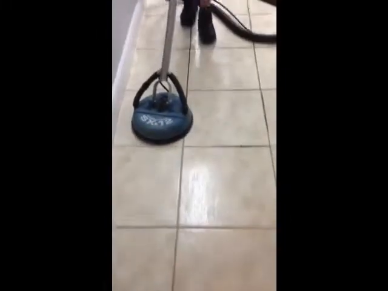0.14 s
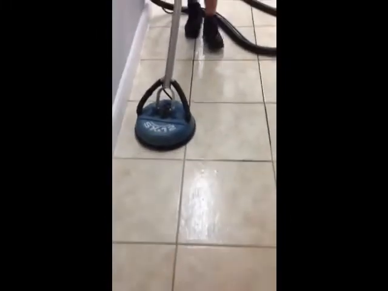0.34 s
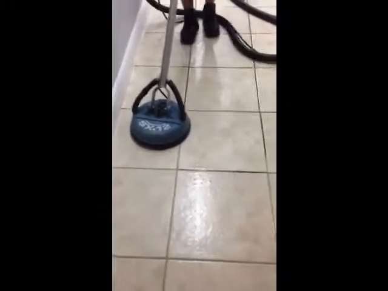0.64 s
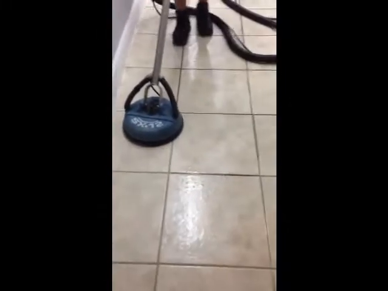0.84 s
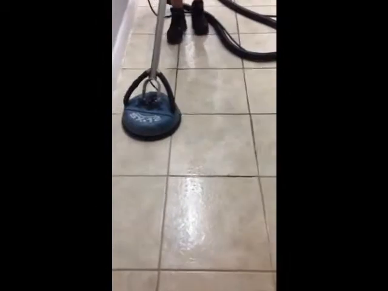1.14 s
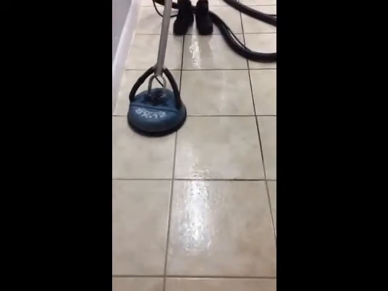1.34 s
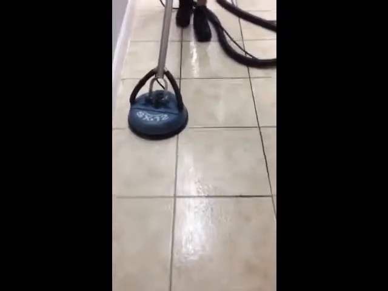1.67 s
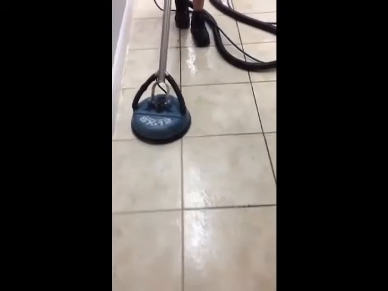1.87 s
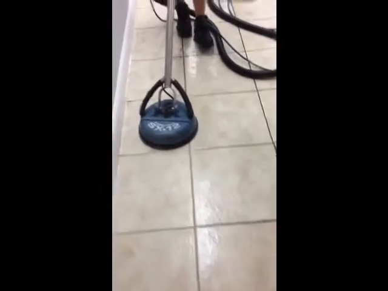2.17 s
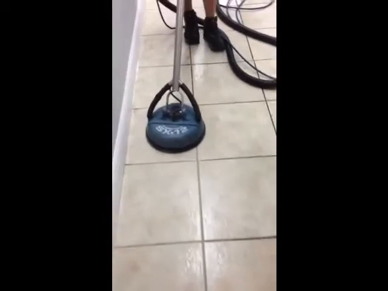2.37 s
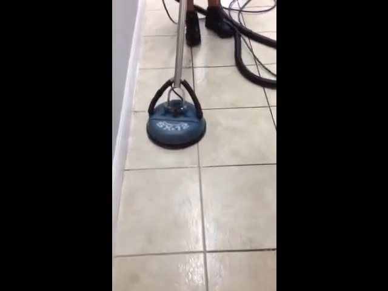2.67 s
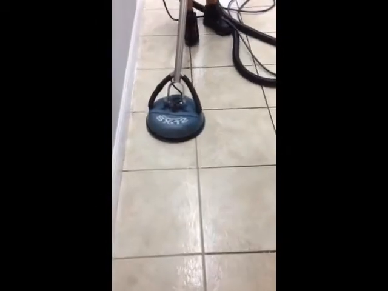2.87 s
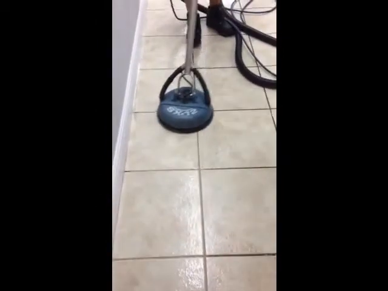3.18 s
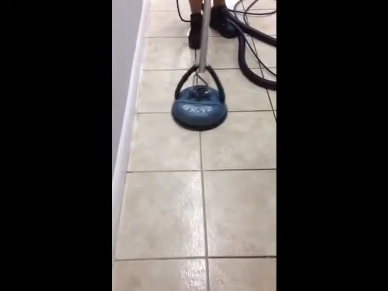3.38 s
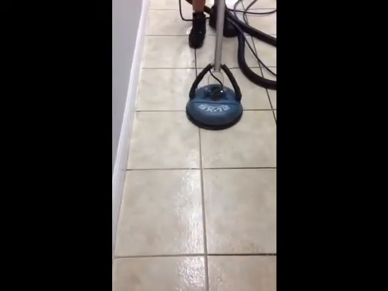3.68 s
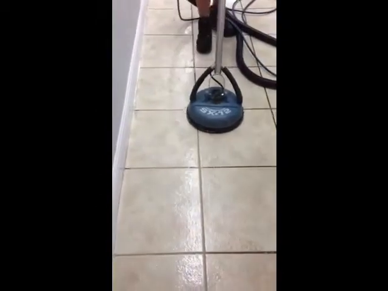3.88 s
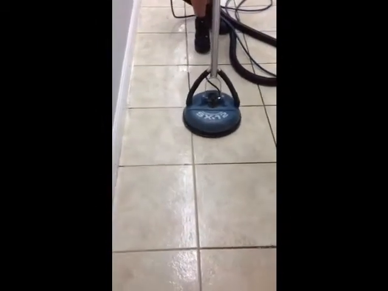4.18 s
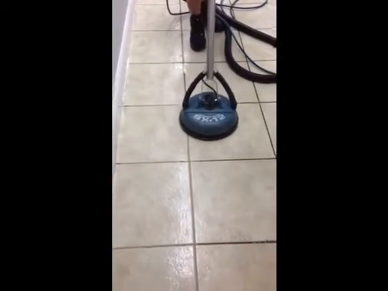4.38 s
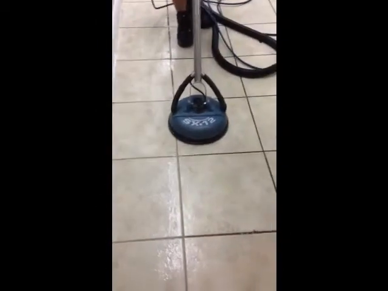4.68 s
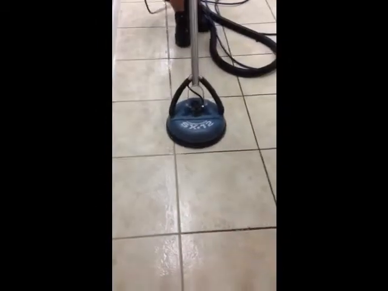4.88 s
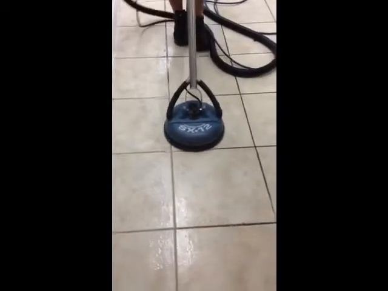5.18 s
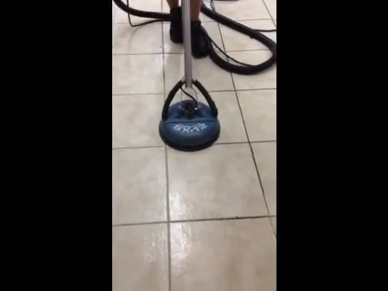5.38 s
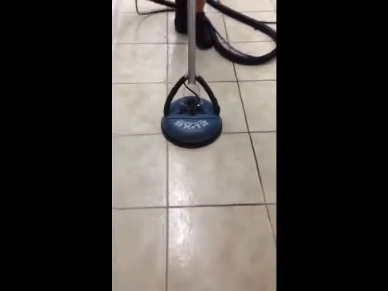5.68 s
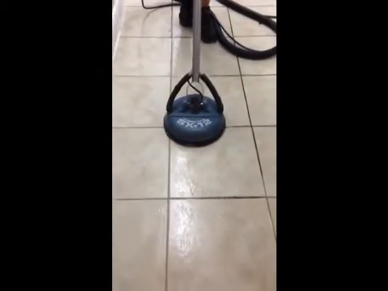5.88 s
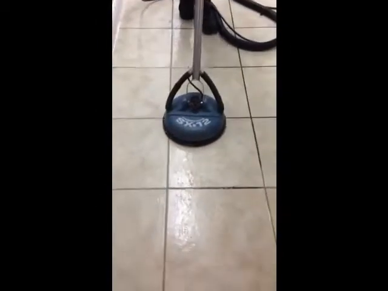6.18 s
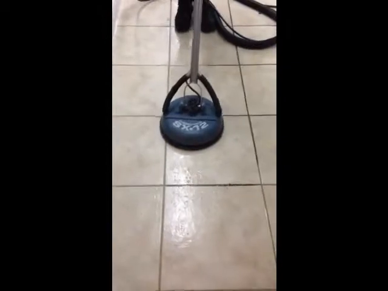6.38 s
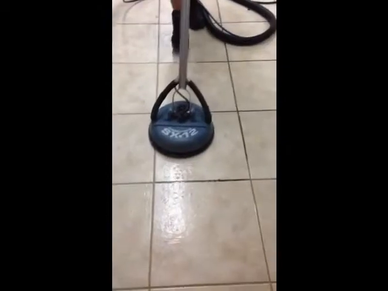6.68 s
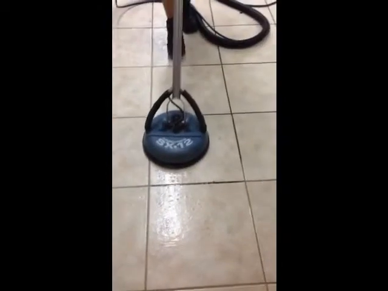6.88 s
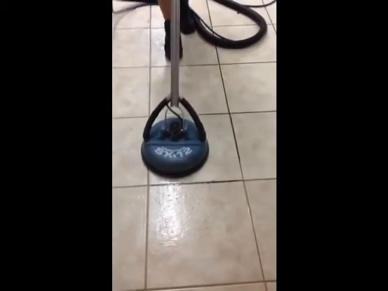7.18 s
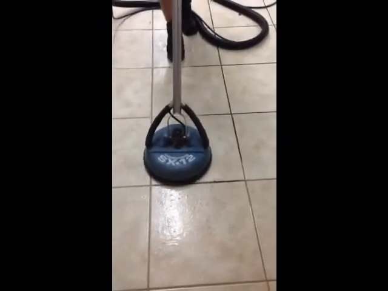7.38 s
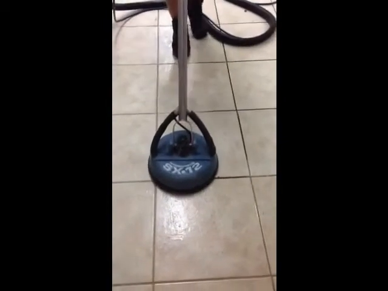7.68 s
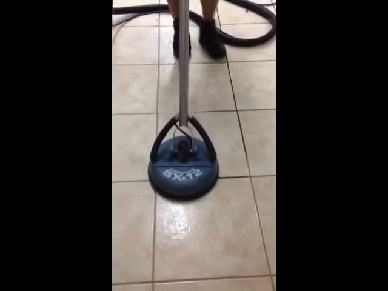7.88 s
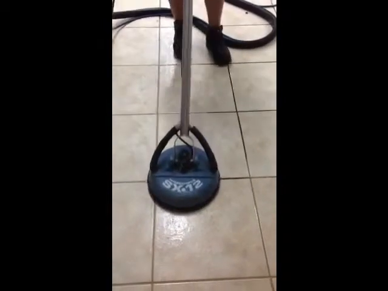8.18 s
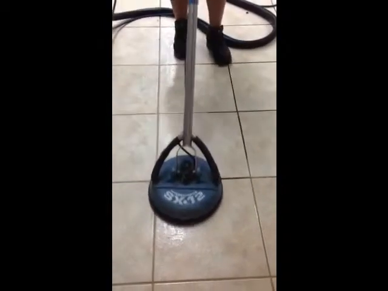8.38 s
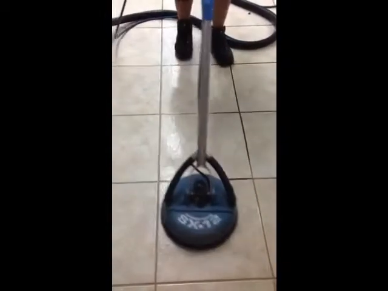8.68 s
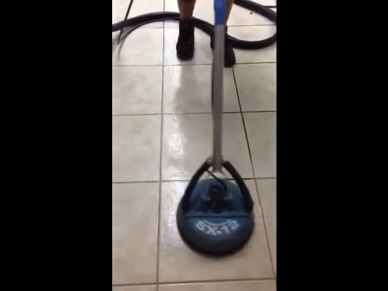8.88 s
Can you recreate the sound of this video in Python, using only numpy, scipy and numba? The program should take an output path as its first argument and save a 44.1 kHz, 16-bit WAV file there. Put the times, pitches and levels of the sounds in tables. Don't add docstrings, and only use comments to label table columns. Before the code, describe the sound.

A loud, steady hiss of water jets spattering wet tile under a domed floor tool, with faint hollow suction tones and low hose rumble.

```python
import sys
import numpy as np
from scipy import signal
from scipy.fft import rfft, irfft
from scipy.io import wavfile
from scipy.ndimage import uniform_filter1d
from numba import njit

SR = 44100
rng = np.random.default_rng(int(sys.argv[2]) if len(sys.argv) > 2 else 0)


def bounce(signal):
    frames = np.transpose(np.atleast_2d(signal))
    limited = np.clip(frames, -1, 1)
    pcm = np.round(limited * 32767).astype(np.int16)
    wavfile.write(sys.argv[1], SR, pcm)


def boost_factor(decibels):
    exponent = np.asarray(decibels, float) / 20
    return 10 ** exponent


N = 398656
TIME = np.arange(N) / SR

# f/Hz, density level/dB
HISS_SPECTRUM = [(900, -18), (1120, -11.5), (1400, -9.5), (1610, -1.5), (1870, -2.5), (2030, 0),
                 (2900, -1.5), (3050, -2), (3600, -2), (4200, -4), (4800, -9), (6000, -14.5), (8000, -24)]
# f/Hz, density level/dB
SPRAY_SPECTRUM = [(4000, -2), (4800, 0.5), (5800, 0.5), (8300, 1), (9600, -2.5), (10400, -3.5)]
# t/s, hiss level/dB, fine spray level/dB
SLURRY_GULPS = [(.28, 0.6, -1.3), (.47, -0.6, 0.5), (.63, -1.3, -3), (.92, 0.6, 1), (1.3, 0.5, 1.2),
                (1.52, -1.5, -.7), (1.86, 0.4, .6), (2.17, -0.1, -2), (2.6, 0.7, 0.5), (3.05, -0.3, 0),
                (3.56, 0.5, 1), (3.85, 0, 1), (4.02, -0.3, 0), (4.16, -0.9, -1), (4.7, -.6, -1),
                (5.08, 0, 1), (5.21, -.8, -1.4), (5.55, -1, -1.5), (5.82, 1.5, -1), (5.99, -0.3, -1),
                (6.17, 2.5, 1.7), (6.33, -0.8, -3.7), (6.6, 1, -1.2), (6.95, 0.4, 1), (7.49, .5, 1.5),
                (7.6, 0, -1.5), (8.0, 0, 0.5), (8.95, .5, 3)]
# t/s, distance from the phone/m
TOOL_PATH = [(0, 2.02), (.5, 1.83), (1.0, 2.03), (1.35, 1.92), (1.6, 2.06), (2.4, 2.23), (3.05, 2.34),
             (3.55, 2.27), (4.3, 2.24), (5.2, 2.12), (5.7, 2.2), (6.5, 2), (7.2, 1.86), (7.6, 1.9),
             (8.2, 1.61), (8.6, 1.85), (9.04, 1.73)]
# t/s, gap under the skirt/1, lean of the wand/1, air drawn/1 (all 0 to 1)
HANDS = [(0, .4, 0, 0.95), (.6, 0.7, 0.6, 0.64), (1.3, 0.44, 0.6, 0.42), (1.8, 0.7, 0.27, 0.6),
         (2.5, 0.5, 0.25, 0.5), (3.0, 0.7, 0.2, 0.54), (3.55, 0.3, .1, .35), (4.5, 0.36, 0.4, 0.17),
         (4.85, .55, .35, 0.15), (5.15, 0.45, 0.25, 0.2), (5.6, 1, 0.7, .35), (6.4, 0.88, .97, .5),
         (7.5, 0.83, .97, 0.6), (8.1, 0.46, 0.8, 0.57), (8.6, 0.45, .8, .55), (9.04, 0, .6, .9)]
# f/Hz, width/Hz, level at 2 m/dB
SKIRT_SLOTS = [(2020, 130, -37), (2488, 120, -38.5), (2868, 150, -39)]
# t/s, f/Hz, half length/s, level/dB
GROUT_FLARES = [(.35, 2800, .2, -29.5), (.45, 2480, .08, -28), (.92, 2480, .06, -24), (.92, 4180, .08, -29),
                (1.28, 2450, 0.16, -26), (.22, 4000, .06, -31), (2.48, 4110, .14, -32),
                (2.63, 2030, 0.065, -27.5), (3.57, 3770, 0.13, -28), (4.05, 2410, .08, -27),
                (4.5, 2670, .15, -30.5), (6.25, 2830, .08, -31), (6.6, 2730, .2, -28.5),
                (7.5, 4220, .3, -34.5), (8.0, 7900, .1, -35), (8.5, 4180, .3, -33.5), (8.9, 2300, .2, -27),
                (8.92, 4400, .1, -31)]
# t/s, f/Hz, half length/s, level/dB
SINGING_NOTES = [(1.12, 1223, 0.14, -29.5), (1.24, 1285, 0.48, -39.5), (2.66, 1285, .2, -36),
                 (.7, 745, 0.64, -42), (2.6, 748, 0.46, -39.5), (1.7, 746, .4, -44.5),
                 (3.1, 580, .8, -44.5), (3.39, 742, 0.092, -31), (6.15, 1255, .2, -33.5),
                 (7.02, 1225, 0.3, -35), (7.8, 1260, 0.16, -41), (6.6, 789, 0.3, -42),
                 (7.65, 778, 0.22, -41.5), (8.35, 817, 0.16, -36.5), (8.8, 184, .25, -46),
                 (8.5, 280, 0.51, -47), (8.3, 385, .6, -44), (.08, 230, 0.1, -42), (7.2, 665, .3, -42.5),
                 (2.6, 2700, 0.033, -28), (8.9, 2060, .2, -29.5)]
# f/Hz, density level/dB
RUMBLE_SPECTRUM = [(30, -53.5), (90, -27.5), (130, -15), (200, 0), (450, -6.5), (530, -6), (900, -11.5),
                   (1150, -7.5)]
# f/Hz, width/Hz, level/dB
ROOM_MODES = [(135.8, 11.8, -15), (184, 17, -7), (279.2, 8.6, -15.5), (391.6, 78, -7.5)]
# t/s, lowest f/Hz, highest f/Hz, level/dB
SIDE_BURSTS = [(.02, 5130, 6300, -35), (2.89, 6200, 7700, -33), (2.93, 5600, 7700, -36),
               (3.07, 8200, 9700, -37), (4.88, 8200, 9700, -36), (4.88, 4100, 5200, -35),
               (5.25, 4600, 5700, -34), (6.09, 8200, 9700, -35), (7.06, 5130, 6900, -34),
               (7.39, 8200, 9700, -37), (7.39, 6200, 7600, -34), (7.83, 6200, 7660, -35),
               (8.01, 6200, 7700, -31), (8.01, 4120, 5200, -31)]

HISS_DB, SPRAY_DB, RUMBLE_DB = -14, -22.5, -36.5
SPRAY_FALL, RUMBLE_FALL, LOW_FALL = 0.5, 0.34, 0.77
GULP_HALF_S = 0.045
CORE_HZ, CORE_HZ_PER_M, CORE_DRIFT_HZ = 2400, 110, 60
HOLLOW_HZ, HOLLOW_DRIFT_HZ, HOLLOW_WIDTH_HZ = (771, 1253), (5, 9.2), (160, 130)
LOW_DB, LOW_AIR_DB = -37, 9
HIGH_SHUT_DB, HIGH_OPEN_DB = -44, -33
WAND_HZ, WAND_WIDTH_HZ = (579.3, 667), 51
WAND_DB, WAND_LEAN_DB, WAND_AIR_DB, RUMBLE_AIR_DB = -43, -4.5, 3, 1.5
TOP_HZ = 10335
CEILING = 1.3
FRAME = 2048


def jets():
    fall_db = np.outer([1, SPRAY_FALL], loss_db())
    hiss_db, spray_db = gulps() + [[HISS_DB], [SPRAY_DB]] + fall_db
    core_hz = CORE_HZ + CORE_HZ_PER_M * curves(TOOL_PATH)[0] + CORE_DRIFT_HZ * walk(3)
    surge = walk(18)
    body = colour(spatter(scatter_db=2.0), HISS_SPECTRUM)
    core = svf(body, core_hz, 1300.)
    hiss = boost_factor(hiss_db + 0.27 * surge + 0.49 * walk(40)) * unit(body + 0.18 * core)
    spray = colour(spatter(scatter_db=2.5), SPRAY_SPECTRUM)
    spray = boost_factor(spray_db + 0.51 * surge + 0.36 * walk(24)) * spray
    return patchy(hiss + spray, patchy_db=.7, span_hz=900, span_s=.022)


def spatter(scatter_db):
    strength = np.minimum(rng.exponential(size=N), 5)
    return unit(rng.standard_normal(N) * boost_factor(scatter_db * strength))


def gulps():
    return sum(np.outer(db, np.exp(-((TIME - s) / GULP_HALF_S) ** 2)) for s, *db in SLURRY_GULPS)


def patchy(x, patchy_db, span_hz, span_s):
    hz, s, cells = signal.stft(x, SR, nperseg=512)
    chance = rng.standard_normal(cells.shape)
    for axis, span in enumerate((span_hz / hz[1], span_s / s[1])):
        size = int(span) + 1
        chance = uniform_filter1d(uniform_filter1d(chance, size, axis=axis), size, axis=axis)
    uneven = signal.istft(cells * boost_factor(patchy_db * unit(chance)), SR)[1][:N]
    return unit(uneven) * np.std(x)


def slots():
    ridges = sum(boost_factor(db + 3.0 * walk(12)) * ring(hz, width) for hz, width, db in SKIRT_SLOTS)
    return boost_factor(loss_db() + 5.5) * ridges


def dome():
    gap, _, air = curves(HANDS)
    low_hz, high_hz = (hz + drift * walk(3.01) for hz, drift in zip(HOLLOW_HZ, HOLLOW_DRIFT_HZ))
    low_db = LOW_DB + LOW_AIR_DB * air + LOW_FALL * loss_db()
    high_db = HIGH_SHUT_DB + (HIGH_OPEN_DB - HIGH_SHUT_DB) * gap
    low = boost_factor(low_db) * ring(low_hz, HOLLOW_WIDTH_HZ[0])
    high = boost_factor(high_db) * ring(high_hz, HOLLOW_WIDTH_HZ[1])
    return low + high


def singing(notes, width_hz):
    total = np.zeros(N)
    for s, hz, half_s, db in notes:
        swell = np.exp(-((TIME - s) / half_s) ** 2)
        total += boost_factor(db) * swell * ring(hz, width_hz)
    return total


def suction():
    _, lean, air = curves(HANDS)
    upper = np.clip(lean, 0, 1)
    rumble_db = RUMBLE_DB + RUMBLE_FALL * loss_db() + RUMBLE_AIR_DB * air
    wand_db = WAND_DB + WAND_LEAN_DB * upper + WAND_AIR_DB * air + walk(3.2)
    rumble = colour(rng.standard_normal(N), RUMBLE_SPECTRUM)
    modes = sum(boost_factor(db + .8 * walk(3.3)) * ring(hz, width) for hz, width, db in ROOM_MODES)
    thud = colour(rng.standard_normal(N), [(30, -10.0), (60, -5.0), (110, 9.5)])
    thud = boost_factor(3.5 * walk(26) - 27.5) * thud
    low, high = (ring(hz, WAND_WIDTH_HZ) for hz in WAND_HZ)
    wand = np.sqrt(1 - upper) * low + np.sqrt(upper) * high
    return boost_factor(rumble_db) * (rumble + modes + thud) + boost_factor(wand_db) * wand


def corridor(x, t60, wet_db, dull_hz, count):
    lag = np.arange(int(t60 * SR))
    place = TIME / TIME[-1] * (count - 1)
    wet = np.zeros(N)
    walls = signal.butter(2, dull_hz, fs=SR)
    lead = np.r_[x[len(lag):0:-1], x]
    for spot in range(count):
        echo = rng.standard_normal(len(lag)) * boost_factor(-60 * lag / len(lag))
        echo = signal.lfilter(*walls, echo / np.linalg.norm(echo))
        share = np.cos(np.pi / 2 * np.clip(place - spot, -1, 1))
        wet += share * signal.fftconvolve(lead, echo)[len(lag):][:N]
    return x + boost_factor(wet_db) * wet


def loss_db():
    return -20 * np.log10(curves(TOOL_PATH)[0])


def ring(hz, width_hz):
    hz = hz + np.zeros(N)
    once = svf(rng.standard_normal(N), hz, 1. * width_hz)
    return unit(svf(once, hz, 1. * width_hz))


@njit
def svf(x, hz, width):
    y, band, low = np.empty(len(x)), 0., 0.
    for i in range(len(x)):
        g, k = np.tan(np.pi * hz[i] / SR), width / hz[i]
        v = (band + g * (x[i] - low)) / (1 + g * (g + k))
        band, low, y[i] = 2 * v - band, low + 2 * g * v, k * v
    return y


def colour(x, points):
    hz, db = np.transpose(points)
    hz = np.r_[hz[0] / 2, hz, hz[-1] * 2]
    db = np.r_[db[0] - 40, db, db[-1] - 40]
    axis = np.log(np.maximum(np.fft.rfftfreq(len(x), 1 / SR), 1))
    return unit(irfft(rfft(x) * boost_factor(np.interp(axis, np.log(hz), db)), len(x)))


def between(x, low_hz, high_hz):
    hz = np.fft.rfftfreq(len(x), 1 / SR)
    return irfft(rfft(x) * ((hz >= low_hz) & (hz < high_hz)), len(x))


def walk(rate):
    k = int(SR / rate)
    held = np.repeat(rng.standard_normal(N // k + 1), k)
    return unit(uniform_filter1d(uniform_filter1d(held, k), k)[:N])


def curves(table):
    s, *columns = np.transpose(table)
    return [np.interp(TIME, s, c) for c in columns]


def unit(x):
    return x / np.sqrt(np.mean(x ** 2))


def scene():
    tool = jets() + dome() + slots() + singing(GROUT_FLARES, width_hz=330)
    mono = corridor(tool, t60=0.2, wet_db=-6.5, dull_hz=1830, count=9)
    mono = mono + suction() + singing(SINGING_NOTES, width_hz=19.0)
    mono = CEILING * np.tanh(mono / CEILING)
    mono = between(mono, 0, TOP_HZ)
    return np.array([mono, mono])


def dropouts(x, from_hz, share, cut_db):
    hz, s, cells = signal.stft(x, SR, nperseg=FRAME)
    odds = share * np.clip((hz - from_hz) / (TOP_HZ - from_hz), 0, 1)
    seeds = rng.random(cells.shape) < odds[:, None] / 4
    spread = uniform_filter1d(uniform_filter1d(1. * seeds, size=4, axis=0), size=2, axis=1)
    return signal.istft(cells * np.where(spread > 1e-3, boost_factor(cut_db), 1), SR)[1][:N]


def low_pass(x):
    return signal.sosfilt(signal.butter(12, 11670, fs=SR, output="sos"), x)


def record(dry):
    side = np.zeros(N + 2 * FRAME)
    for s, low_hz, high_hz, db in SIDE_BURSTS:
        burst = unit(between(rng.standard_normal(FRAME), low_hz, high_hz)) * np.hanning(FRAME) ** 0.64
        start = int(s * SR) + FRAME // 2
        side[start:start + FRAME] += boost_factor(db) * burst
    side = side[FRAME:FRAME + N]
    mono = dropouts(dry[0], from_hz=3500, share=.016, cut_db=-22)
    return low_pass(mono + np.array([side, -side]))


dry = scene()
out = record(dry)
bounce(out)
```